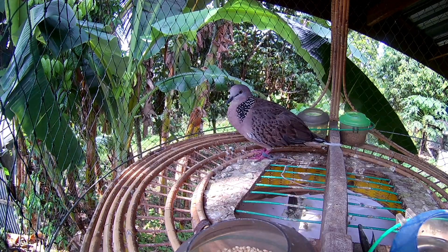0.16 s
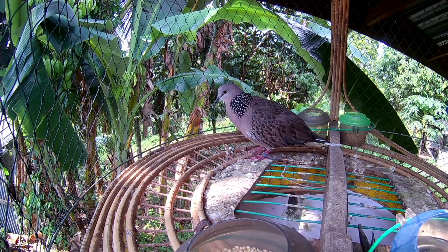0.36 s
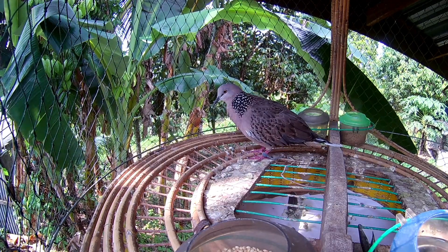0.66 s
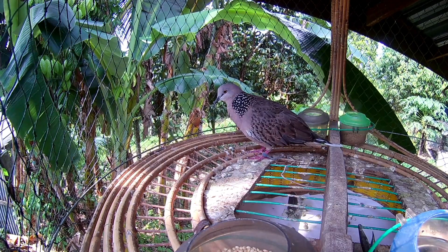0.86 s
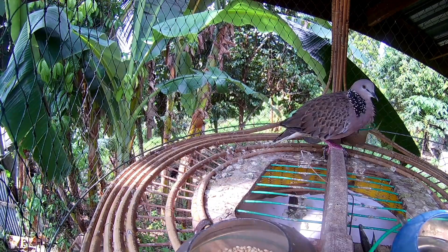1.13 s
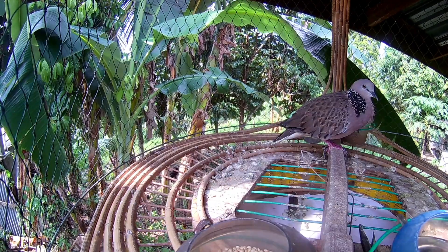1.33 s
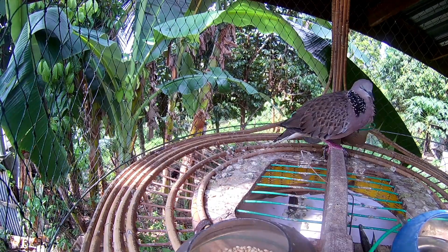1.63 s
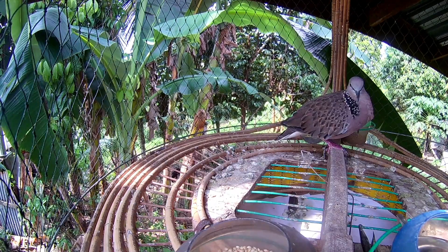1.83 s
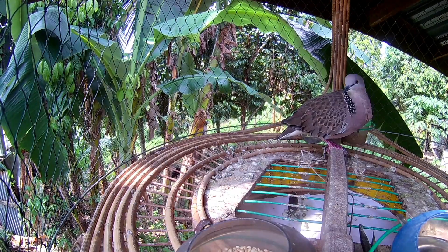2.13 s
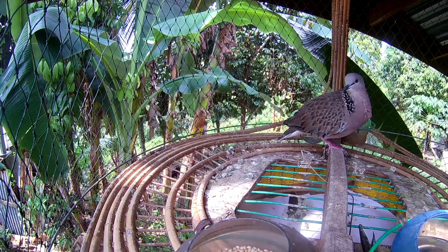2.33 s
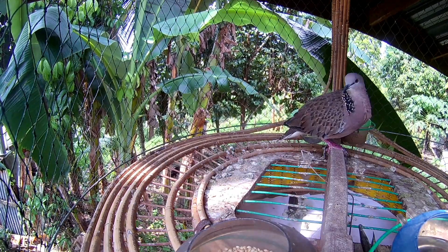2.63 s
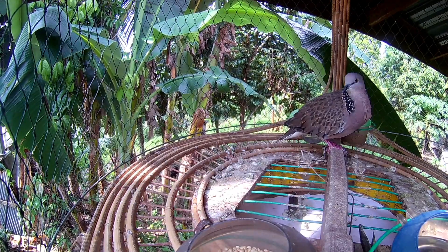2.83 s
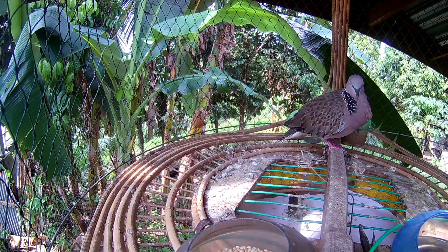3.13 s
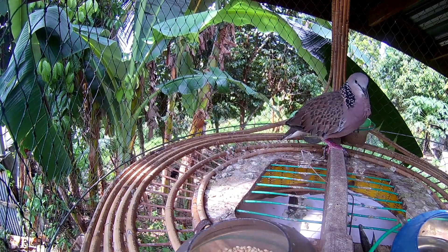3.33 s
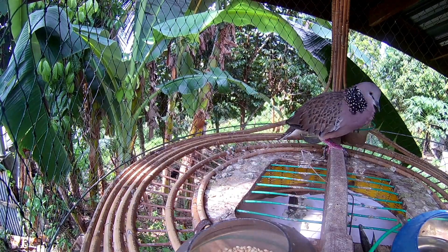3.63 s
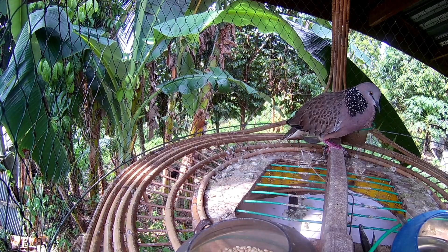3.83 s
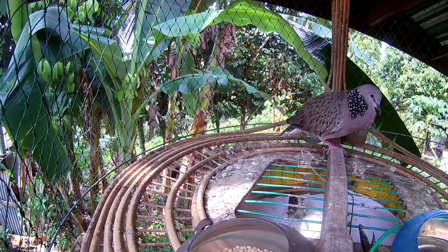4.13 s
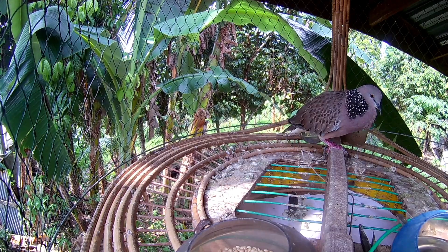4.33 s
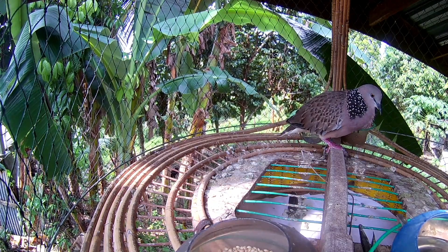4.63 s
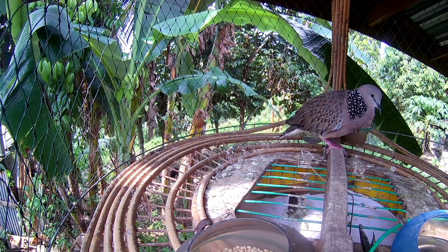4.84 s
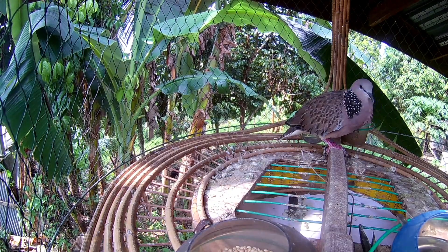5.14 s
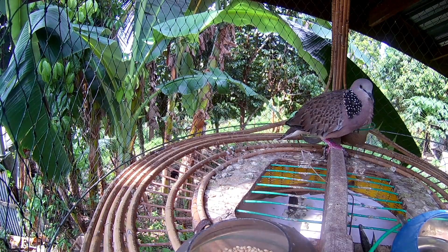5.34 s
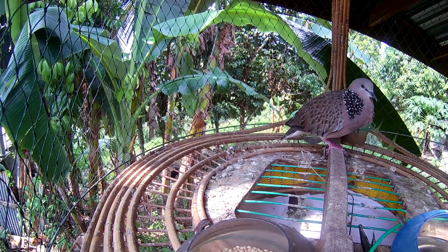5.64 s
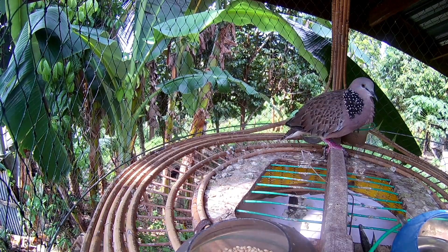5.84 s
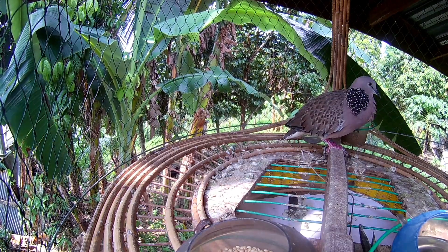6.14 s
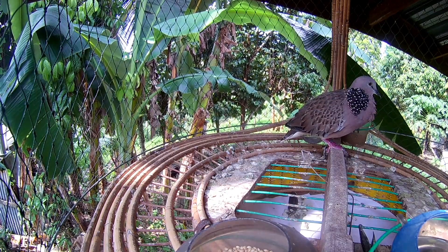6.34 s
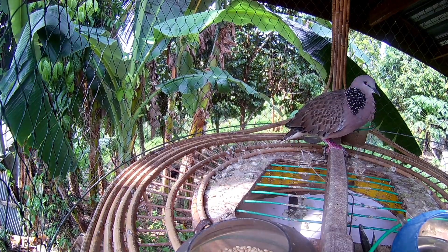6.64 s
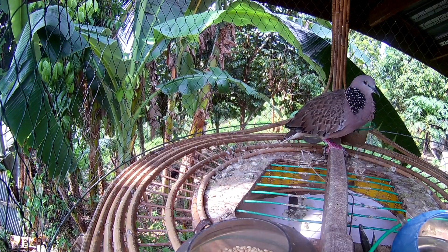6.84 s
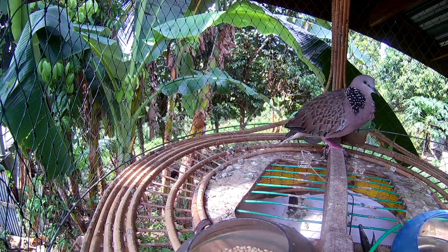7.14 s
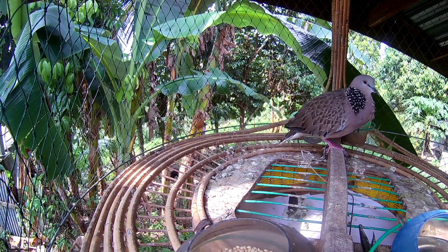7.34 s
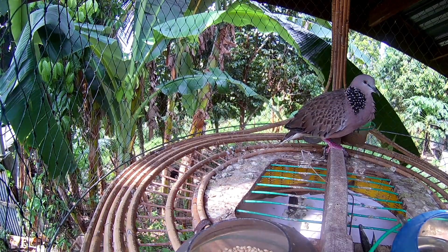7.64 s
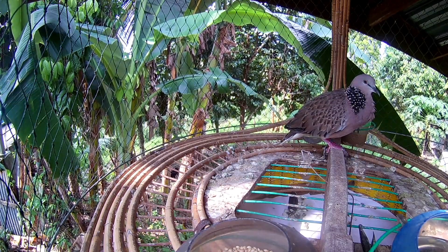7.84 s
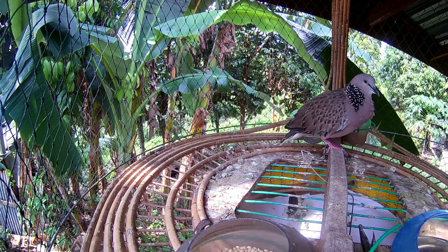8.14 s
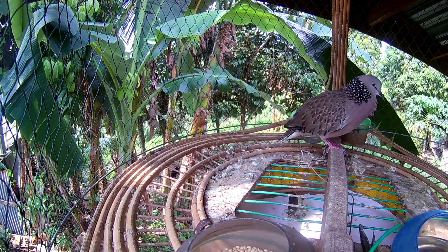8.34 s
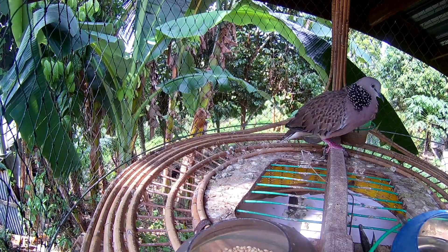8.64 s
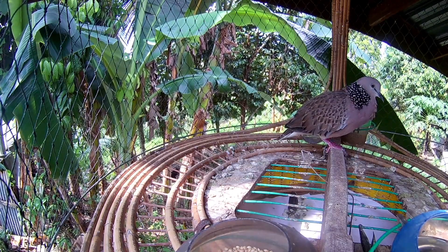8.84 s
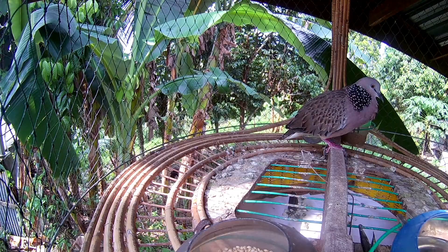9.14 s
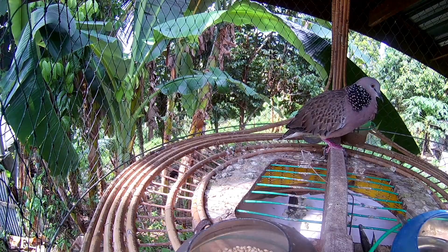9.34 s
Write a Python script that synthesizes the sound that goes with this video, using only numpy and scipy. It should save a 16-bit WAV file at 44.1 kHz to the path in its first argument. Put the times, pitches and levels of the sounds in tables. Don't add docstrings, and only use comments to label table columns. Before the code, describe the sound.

Motorbike putter stops with a sudden cut; in a quiet garden a spotted dove gives two throaty rolled coos over far chirps and slowly rising road noise.

```python
import sys
import numpy as np
from scipy import signal
from scipy.fft import rfft, irfft, next_fast_len
from scipy.io import wavfile
from scipy.ndimage import uniform_filter1d, minimum_filter1d, map_coordinates

SR = 44100
rng = np.random.default_rng(int(sys.argv[2]) if len(sys.argv) > 2 else 0)


def natural_amplitude(level_db):
    exponent = np.asarray(level_db, float) / 20
    return 10 ** exponent


def wav_record(signal):
    frames = np.transpose(np.atleast_2d(signal))
    bounded = np.clip(frames, -1, 1)
    quanta = np.round(bounded * 32767).astype(np.int16)
    wavfile.write(sys.argv[1], SR, quanta)


N = 418068
T = np.arange(N) / SR

# hoot start t/s, swell end t/s, swell stretch, rolled note start t/s, roll stretch
COOS = [
    (3.523, 3.891, 1.1, 4.046, 1.003),
    (8.377, 8.729, 1, 8.886, .997),
]
# t/s, f/Hz, level/dB
HOOT = [
    (0, 449.5, -24),
    (.013, 608, -14),
    (.025, 656.5, -9.5),
    (.042, 750.5, -11.5),
    (.055, 649.4, -8.5),
    (.077, 618, -8.5),
    (.09, 583.4, -16.5),
    (.12, 537.7, -22),
]
# t/s, f/Hz, level/dB
SWELL = [
    (-.2, 562.4, -26),
    (-.165, 550, -21.5),
    (-.135, 600, -15.5),
    (-.112, 628.6, -10),
    (-.084, 640.8, -7),
    (-.057, 750.8, -9),
    (-.01, 727, -8),
    (0, 540.2, -13),
]


def unit(x):
    return x / np.sqrt(np.mean(x ** 2) + 1e-20)


def along(points, hz):
    f, v = np.transpose(points)
    return np.interp(np.log(hz + 1), np.log(f + 1), v)


def curves(rows, t=T):
    s, *cols = np.transpose(rows)
    return [np.interp(t, s, c) for c in cols]


def wobble(rate, t=T):
    knots = rng.standard_normal(int(N * rate / SR) + 4)
    return map_coordinates(knots, [t * rate])


def filtered(x, response):
    m = next_fast_len(N + SR // 2)
    return irfft(rfft(x, m) * response(np.fft.rfftfreq(m, 1 / SR)), m)[..., :N]


def rush(spectrum, patchy_db):
    z = signal.stft(rng.standard_normal(N), nperseg=512)[2]
    field = uniform_filter1d(rng.standard_normal(z.shape), size=5, axis=0)
    field = uniform_filter1d(field, size=12, axis=1)
    noise = signal.istft(z * natural_amplitude(patchy_db * unit(field)), nperseg=512)[1][:N]
    return unit(filtered(noise, lambda hz: natural_amplitude(along(spectrum, hz))))


def trees(x):
    # f/Hz, t60/s
    decay = [(300, 0.85), (1500, 0.54), (8000, 0.033)]
    hz, t, z = signal.stft(rng.standard_normal(SR // 2), SR, nperseg=256)
    fading = natural_amplitude(-60 * t / along(decay, hz)[:, None])
    tail = signal.istft(z * fading, SR, nperseg=256)[1]
    return signal.fftconvolve(x, tail / np.linalg.norm(tail))[:N]


def garden():
    # t/s, level/dB
    wind = [(0.96, -43), (1.15, -43.5), (3.28, -45), (3.59, -42), (4.0, -45), (4.64, -40.5), (5.06, -43),
            (5.4, -42.5), (6.56, -45.5), (7.13, -43.5), (7.67, -45.5), (9.48, -36.5)]
    # t/s, level/dB
    road = [
        (.96, -55),
        (2.8, -54),
        (4.8, -53),
        (6, -50),
        (6.9, -44),
        (7.4, -46.5),
        (8.3, -44),
        (9.48, -41),
    ]
    # f/Hz, level/dB
    rumble_spectrum = [(12, -28.5), (20, 1.5), (130, -7.5), (166, -13), (239, -18.5), (300, -32.5),
                       (390, -61), (660, -120)]
    tyre_spectrum = [(88, -40), (150, -2), (252, -2.5), (330, -3), (361, -5.5), (452, -5.5), (900, -10),
                     (1170, -26.5), (1980, -120)]
    traffic_spectrum = [(410, -25), (700, -8.5), (830, -16), (1020, -6), (1260, -2.5), (1570, -9),
                        (1740, -15.5), (2060, -13.5), (2790, -30.5), (6000, -44), (7800, -65),
                        (13200, -120)]
    hiss_spectrum = [(1470, -28), (2500, -1), (7830, -12.5), (11100, -13), (15100, -11), (15800, -10)]
    # f/Hz, level/dB at about average traffic
    engines = [(62, -49), (245, -50), (362, -52)]
    (wind_db,), (road_db,) = curves(wind), curves(road)
    tyre_db = -45 + .79 * (road_db - road_db.mean())
    rumble = natural_amplitude(wind_db + 3 + 1.2 * wobble(3) + .8 * wobble(11)) * rush(rumble_spectrum, patchy_db=1.6)
    tyres = natural_amplitude(tyre_db + 2 + 1.3 * wobble(1.9)) * rush(tyre_spectrum, patchy_db=1.2)
    traffic = natural_amplitude(road_db + 1 + .8 * wobble(4)) * rush(traffic_spectrum, patchy_db=.9)
    hum = np.zeros(N)
    for hz, db in engines:
        level = natural_amplitude(db + tyre_db + 46 + 2.2 * wobble(4))
        hum += level * np.sin(2 * np.pi * np.cumsum(hz + 2.507 * wobble(7)) / SR)
    hiss = natural_amplitude(-63.5) * rush(hiss_spectrum, patchy_db=-1.5)
    return rumble + tyres + traffic + hum + hiss


def songs():
    # t/s, length/s, f/Hz, level/dB
    piper = [(1.39, 0.028, 1290, -53), (1.45, .02, 1250, -50), (1.68, .03, 1300, -56),
             (1.8, 0.062, 1320, -54), (1.98, 0.055, 1320, -53), (2.19, 0.091, 1320, -54.5),
             (2.41, 0.071, 1310, -54), (2.77, .06, 1310, -58), (2.97, 0.078, 1290, -54),
             (3.13, 0.059, 1280, -52), (3.34, .05, 1280, -52), (4.96, .1, 1300, -58),
             (7.07, 0.039, 1230, -43), (7.24, .12, 1247, -46.5), (7.5, 0.1, 1238, -44),
             (7.7, .1, 1217, -45.5), (7.93, .09, 1220, -44.5), (8.18, .075, 1218, -45),
             (9.33, .06, 1200, -43.5)]
    # t/s, length/s, level/dB
    hooter_calls = [(1.95, .03, -56), (2.39, .03, -54), (5.37, .11, -48), (5.61, .05, -48),
                    (5.735, .06, -46), (5.885, .075, -46), (6.035, .075, -46), (6.215, .1, -45),
                    (6.415, .135, -45.5), (6.63, .18, -45), (6.88, .17, -45)]
    # t/s, length/s, f/Hz, level/dB
    neighbour = [
        (3.31, .07, 765, -44.5),
        (3.376, 0.046, 783, -44),
        (3.45, .057, 723, -45),
    ]
    # t/s, length/s, start f/Hz, end f/Hz, level/dB
    chirps = [(1.98, 0.057, 2066, 3710, -57.5), (2.019, .03, 3680, 3600, -60.5),
              (2.245, 0.055, 2100, 3250, -63), (2.31, .03, 3250, 3300, -70), (1.56, .09, 5700, 6200, -76),
              (1.66, .09, 6500, 6100, -71), (1.77, .11, 6100, 6000, -75), (3.78, 0.057, 5920, 6180, -72.5),
              (4.381, .026, 2600, 2470, -57.5), (4.385, 0.055, 5060, 4200, -69.5),
              (4.55, .035, 2770, 2430, -52), (4.699, 0.095, 3600, 3130, -63.5), (4.3, .02, 2600, 2476, -58),
              (5.9, .04, 2300, 2300, -60.5), (6.4, .06, 2900, 2950, -62), (5.41, 0.049, 4400, 5000, -67),
              (5.655, .018, 2500, 2550, -51.5), (6.5, 0.055, 3750, 3580, -65.5)]
    hooter = [(s, length, 1152, db) for s, length, db in hooter_calls]
    # pitch factors at start, turn and end; time to the turn (s)
    birds = [(piper, (1.025, 1, .97), .04), (hooter, (.87, 1, 1), .028), (neighbour, (.975, 1, .98), .04)]
    notes = []
    for rows, glide, turn_s in birds:
        for s, length, hz, db in rows:
            notes.append((s, length, min(.5, turn_s / length), *(hz * np.array(glide)), db))
    for s, length, start, end, db in chirps:
        midway = start + .65 * (end - start)
        notes.append((s, length, .5, start, midway, end, db))
    return notes


def whistles():
    out = np.zeros(N)
    quaver = .012 * wobble(160)
    for s, length, turn, *hz, db in songs():
        at = round(s * SR)
        u = np.linspace(0, 1, round(length * SR))
        glide = np.interp(u, [0, turn, 1], hz) * (1 + quaver[at:][:len(u)])
        tone = np.sin(2 * np.pi * np.cumsum(glide) / SR)
        out[at:][:len(u)] += natural_amplitude(db + 6) * np.sin(np.pi * u) ** .5 * tone
    return out


def hoarse():
    # t/s, length/s, level/dB
    scolds = [
        (3.838, 0.084, -56.5),
        (4.93, .05, -62),
        (5.13, .05, -63),
        (5.819, 0.062, -50),
        (6.457, 0.11, -46),
        (6.759, .13, -46.5),
        (7.0, .06, -58),
        (8.68, 0.11, -57),
    ]
    # t/s, length/s, level/dB
    scuffs = [
        (2.96, .1, -48),
        (3.018, .012, -39),
    ]
    scold_band = (2600, 1885, 650)
    scuff_band = (600, 550, 400)
    # t/s, length/s, low band f/Hz, high band f/Hz, level/dB
    buzzes = [
        (2.904, .18, 2720, 4450, -60.5),
        (4.51, 0.1, 2470, 4420, -61.5),
        (6.077, .26, 2750, 3540, -63),
        (7.032, 0.202, 2350, 4060, -61.5),
        (8.13, 0.33, 2830, 3980, -54.5),
    ]
    # band (0 low, 1 high), frequency factor, width/Hz, level/dB
    buzz_bands = [(0, 1, 450, -2), (0, 1.2, 1600, -4), (1, 1.03, 1100, -2), (1, 1, 130, -3),
                  (1, 1.45, 1200, -16)]
    calls = []
    for rows, band in [(scolds, scold_band), (scuffs, scuff_band)]:
        calls += [(s, length, 1.5, *band, db) for s, length, db in rows]
    for s, length, *hz, db in buzzes:
        for band, factor, width_hz, rel_db in buzz_bands:
            start_hz = factor * hz[band]
            calls.append((s, length, 1.93, start_hz, 1.03 * start_hz, width_hz, db + rel_db))
    return calls


def rasps():
    out = np.zeros(N)
    flutter = natural_amplitude(2.2 * wobble(110))
    for s, length, late, start_hz, end_hz, width_hz, db in hoarse():
        u = np.linspace(0, 1, round(length * SR))
        lowpass = signal.butter(3, width_hz / SR)
        breath = unit(signal.lfilter(*lowpass, rng.standard_normal(SR // 2)))[:len(u)]
        carrier = np.sin(2 * np.pi * np.cumsum(start_hz + (end_hz - start_hz) * u) / SR)
        out[round(s * SR):][:len(u)] += natural_amplitude(db + 6) * np.sin(np.pi * u ** late) ** .6 * breath * carrier
    return out * flutter


def motorbike():
    # t/s, firing rate/Hz, pipe pitch factor, exhaust level/dB
    bike_pass = [
        (0, 32.7, 1.22, -31.5),
        (.25, 32.3, 1.12, -27),
        (.55, 31.9, 1.04, -25.5),
        (.75, 31.1, .95, -24),
        (.924, 29.9, .84, -22),
    ]
    # f/Hz, width/Hz, level/dB
    pipe = [(112, 62, 0), (305, 95, -5), (62, 35, -8), (600, 300, -20), (1150, 300, -18)]
    # f/Hz, level/dB
    roar_spectrum = [(24, -52), (40, -26), (119, -4), (142, -15.5), (240, -26), (344, -5.5), (779, -20),
                     (1470, -18.5), (1720, -26), (2060, -21.5), (3100, -40), (3800, -40.5), (9000, -76),
                     (11700, -100), (19800, -120)]
    cut_s, step = .9243, .11
    t = T[:SR]
    rate, sink, pipe_db = curves(bike_pass, t)
    roar_db = -31 + .15 * (pipe_db - pipe_db.mean())
    turns = np.cumsum(rate) / SR + .62
    exhaust = 0
    for k in range(1, 50):
        f = k * rate / sink ** np.clip(k / 9, .55, 1)
        gain = 0
        for j, (centre, width, db) in enumerate(pipe):
            resonance = 1j * f * width / (centre * centre - f * f + 1j * f * width)
            gain = gain + (-1) ** j * natural_amplitude(db) * resonance ** 2
        uneven = natural_amplitude((.5 + .1 * k) * wobble(12, t)) * np.exp(.04j * k * wobble(9, t))
        exhaust = exhaust - np.real(uneven * gain * np.exp(2j * np.pi * k * turns))
    puff = np.exp(-3 * (turns % 1))
    roar = unit((1 + .5 * puff) * rush(roar_spectrum, patchy_db=.9)[:SR])
    bike = np.pad(natural_amplitude(pipe_db) * unit(exhaust) + natural_amplitude(roar_db) * roar, (0, N - SR))
    tick = (step - bike[int(cut_s * SR)]) * np.exp((np.minimum(T, cut_s) - cut_s) / .0006)
    return (bike + tick) * (T < cut_s)


def breaths():
    # t/s, f/Hz, level/dB
    rolled = [
        (0, 605.2, -18.5),
        (.011, 658.4, -6.5),
        (.02, 634.3, -18),
        (.03, 748.6, -11.5),
        (.074, 799.2, -12),
        (.25, 744.3, -10.5),
        (.345, 642, -7.5),
        (.405, 614, -9.5),
        (.441, 536, -29.5),
    ]

    def lay(note, s, stretch):
        return [(s + stretch * t, hz, db) for t, hz, db in note]

    notes = []
    for hoot, end, wide, roll, long in COOS:
        notes.append(lay(HOOT, hoot, .96) + lay(SWELL, end, wide))
        notes.append(lay(rolled, roll, long))
    return notes


def shutting():
    # t/s, closure 0-1
    catches = [(3.557, 0.4), (3.733, 0.4), (3.749, 0.91), (3.772, .72), (3.783, .7), (3.796, .59),
               (3.819, .29), (8.408, 0.1), (8.434, .2), (8.582, .8), (8.59, .67), (8.606, 0.95),
               (8.646, 0.6), (8.658, .8)]
    roll_ends = [.285, .3]
    puff_gap_s, puff_scatter_s = .0165, .0025
    first_gap_s, last_gap_s, roll_scatter_s = .025, .0135, .0022
    rows = [(s, closure, -19) for s, closure in catches]
    k = np.arange(24)
    for (hoot, end, wide, roll, _), stop in zip(COOS, roll_ends):
        luck = rng.standard_normal((len(k), 4))
        puffs = hoot + HOOT[-2][0] + puff_gap_s * k + puff_scatter_s * luck[:, 0]
        murmur_end = end + wide * SWELL[1][0] + puff_gap_s
        rows += [(s, .95 + .1 * z, -19) for s, z in zip(puffs, luck[:, 1]) if s < murmur_end]
        slow = .8 ** k
        gaps = last_gap_s + (first_gap_s - last_gap_s) * slow
        beats = roll + np.cumsum(gaps) + roll_scatter_s * (1 - slow) ** 4 * luck[:, 2]
        beats = beats[beats < roll + stop]
        rows += [(s, np.interp(x, [0, 1], [.97, .8]), -.5) for s, x in zip(beats, slow)]
        dying = beats[-1] + last_gap_s + .021 * k[:7] + puff_scatter_s * luck[:7, 3]
        rows += [(s, .75 * .88 ** j, -19) for j, s in enumerate(dying)]
    return rows


def dove():
    # f/Hz, t60/s
    air_sac = (638, .1)
    # f/Hz, level/dB, t60/s
    throat = [(840, -20.5, 0.06), (1110, -20.5, 0.036)]
    # f/Hz, level/dB
    octave_response = [(800, -60), (950, -29), (1100, -32), (1250, -38), (1600, -36), (1800, -60)]
    # f/Hz, level/dB
    body = [(200, -33), (400, -6), (500, -1.5), (1700, 10.5), (2600, -2)]
    sac_hz, sac_t60 = air_sac
    notes = breaths()
    pitch_hz, level_db = curves(np.vstack(notes))
    breathing = sum((T > note[0][0]) & (T < note[-1][0]) for note in notes)
    level = np.sqrt(2) * natural_amplitude(level_db + .3 * wobble(59)) * uniform_filter1d(1. * breathing, size=150)
    closures = shutting()
    opening, sag = np.ones(N), np.zeros(N)
    u = np.arange(-700, 700) / SR
    for s, closure, _ in closures:
        at = round(s * SR)
        near = slice(at - 700, at + 700)
        shut_s = .0028 + .003 * (level_db[at] < -21)
        opening[near] *= 1 - np.clip(closure, 0, 1) * np.exp(-(u / shut_s) ** 2)
        sag[near] += closure ** 2 * np.exp(-np.maximum(u, 0) / .0027) / (1 + np.exp(-u / .0006))
    phase = 2 * np.pi * np.cumsum(pitch_hz * (1 + .0056 * wobble(90) - .3 * sag)) / SR
    voice = level * np.sin(phase)
    t, lag_s = np.arange(SR // 10) / SR, .0024
    soft = 1 - np.exp(-t / .0018)
    click = sum(natural_amplitude(db - 60 * t / t60) * np.sin(2 * np.pi * hz * t) for hz, db, t60 in throat)
    for s, closure, kick_db in closures:
        at = round(s * SR)
        caught = phase[at + round(lag_s * SR)]
        sac = natural_amplitude(kick_db - 60 * t / sac_t60) * np.sin(caught + 2 * np.pi * sac_hz * (t - lag_s))
        weak = natural_amplitude(-.55 * (level_db[at] + 9.5))
        voice[at:at + len(t)] += level[at] * soft * (sac + closure * weak * click)
    voice = voice * opening
    octave = filtered(2 * voice ** 2 / (level + .011), lambda hz: natural_amplitude(along(octave_response, hz)))
    third = natural_amplitude(-51 + 3 * wobble(40)) * level * opening * (pitch_hz > 772) * np.sin(3.15 * phase)
    return filtered(voice + third, lambda hz: natural_amplitude(along(body, hz))) + octave


def scene():
    coo = dove()
    far = whistles() * natural_amplitude(1.6 * wobble(55)) + rasps()
    roof = natural_amplitude(-17) * np.roll(coo, round(.025 * SR))
    near = coo + roof + natural_amplitude(-40) * np.roll(trees(coo), round(.015 * SR))
    birds = natural_amplitude(-1.5) * far + natural_amplitude(-12) * trees(far)
    return (near + birds + garden() + motorbike())[None]


def limited(x, top):
    need = np.minimum(1, top / (abs(x) + 1e-9))
    return x * uniform_filter1d(minimum_filter1d(need, size=260), size=130)


def top_cut(x):
    return signal.sosfilt(signal.butter(12, 16060, fs=SR, output="sos"), x)


def record(dry):
    # t/s, all above is lost f/Hz, depth 0-1
    dropouts = [(.332, 3870, 0.9), (.958, 4700, 0.75), (2.979, 5500, 0.9), (3.418, 2630, 0.64),
                (3.466, 2200, 0.6), (3.56, 3300, 0.94), (4.51, 3000, 0.2), (4.812, 2800, 0.7),
                (5.394, 2300, 0.82), (6.485, 3080, 0.8), (6.532, 4500, 0.7), (6.603, 2900, 0.5),
                (8.481, 3700, 0.95), (8.854, 4500, 0.7), (9.317, 3295, 0.7)]
    hz, t, z = signal.stft(limited(dry, .8), SR, nperseg=256, noverlap=192)
    for s, cut_hz, depth in dropouts:
        moment = np.exp(-((t - s) / .013) ** 4)
        z = z * (1 - np.clip(depth, 0, 1) * (hz[:, None] > cut_hz) * moment)
    mix = signal.istft(z, SR, nperseg=256, noverlap=192)[1][:, :N]
    return top_cut(mix)


dry = scene()
out = record(dry)
wav_record(out)
```